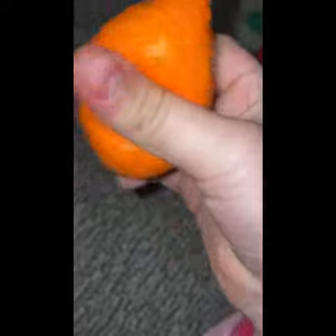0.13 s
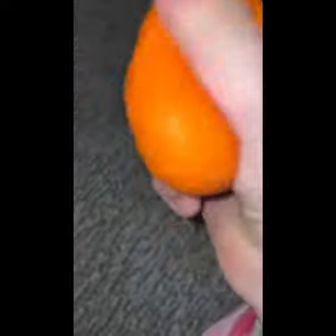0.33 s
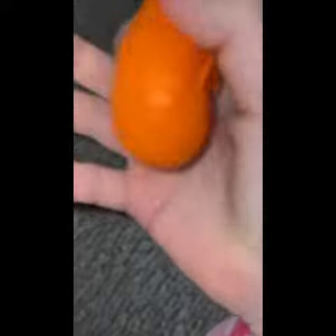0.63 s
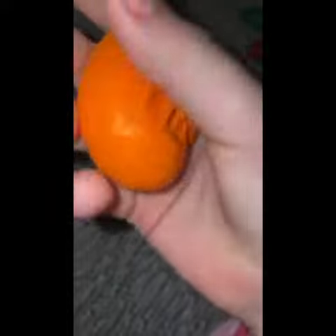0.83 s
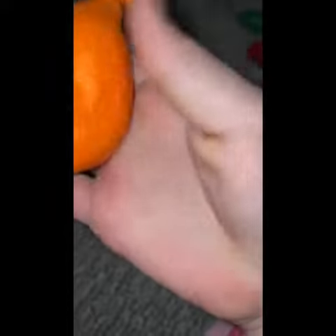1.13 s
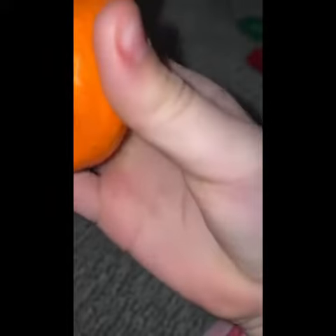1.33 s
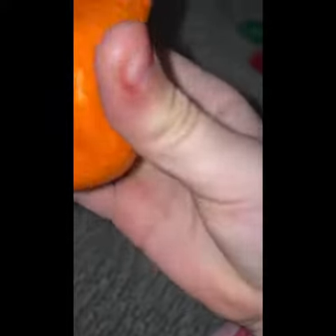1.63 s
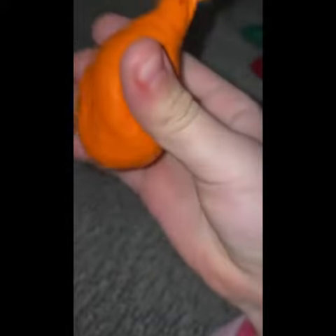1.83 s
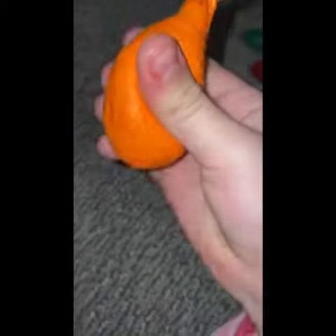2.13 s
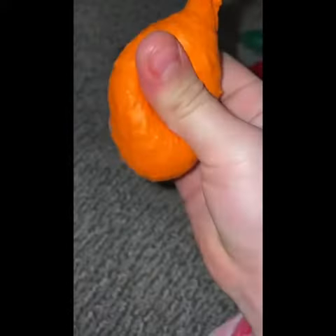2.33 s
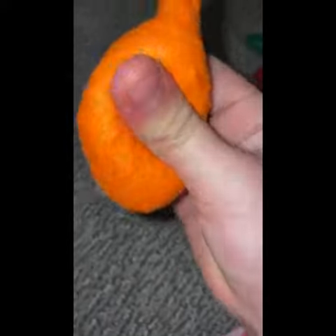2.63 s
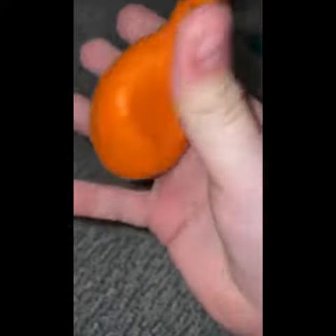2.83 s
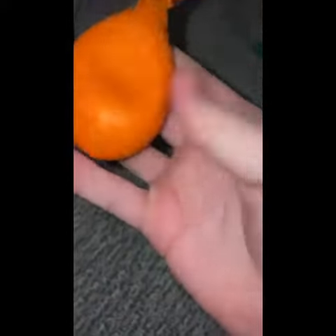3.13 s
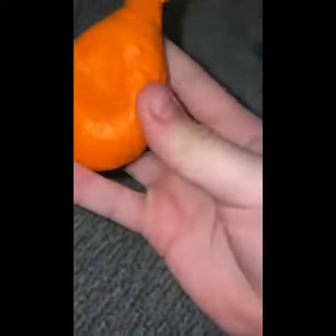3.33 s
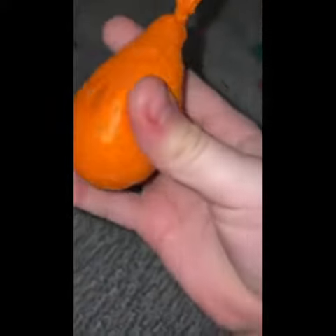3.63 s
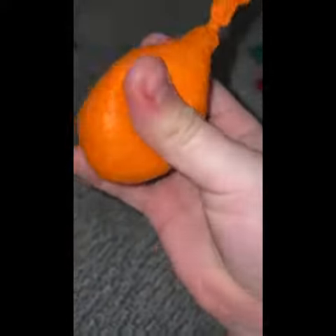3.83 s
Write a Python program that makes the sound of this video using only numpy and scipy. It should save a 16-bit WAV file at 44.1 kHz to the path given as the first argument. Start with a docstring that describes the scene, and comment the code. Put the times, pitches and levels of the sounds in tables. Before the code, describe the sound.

A powder-filled balloon is squeezed close to the microphone: sharp crunch at once, a near-silent pause with faint ticks and rubs, a longer building crackle, another lull, then renewed crunching in a quiet room.

```python
"""A balloon packed with fine powder is squeezed in a hand, close to the microphone, in a quiet room.
The powder yields in short slips, each a burst of tiny ringing grain clicks with a little treble fizz,
over a crunch that follows the squeeze and turns to hiss where it is gentle. Short knocks, bright or
low, are damped rings; skin rubbing on rubber is swells of band noise. The room is faint noise and
low hum."""
import sys
import numpy as np
from scipy import signal
from scipy.fft import rfft, irfft
from scipy.io import wavfile
from scipy.ndimage import uniform_filter1d

SR = 44100
rng = np.random.default_rng(int(sys.argv[2]) if len(sys.argv) > 2 else 0)


def generate_wav(sig):
    """Save sig (samples, or channels by samples) to the path in sys.argv[1] as 16-bit PCM at SR."""
    pcm = np.round(np.clip(np.atleast_2d(sig).T, -1, 1) * 32767).astype(np.int16)
    wavfile.write(sys.argv[1], SR, pcm)


N = 176400


def gain_of(db):
    """Amplitude factor of a level in dB."""
    return 10 ** (np.asarray(db) / 20)


def power_db(power):
    """Level in dB of a power."""
    return 10 * np.log10(power)


def evened(x):
    """Scale to unit RMS."""
    return x / np.sqrt(np.mean(x ** 2) + 1e-20)


def read(points, hz):
    """Interpolate a (frequency, dB) curve on a log-frequency axis."""
    point_hz, point_db = np.transpose(points)
    return np.interp(np.log(hz + 1), np.log(point_hz + 1), point_db)


def add(mix, start_s, sound):
    """Add a sound into the mix in place, cut at its end."""
    part = mix[max(round(start_s * SR), 0):][:len(sound)]
    part += sound[:len(part)]


def coloured(x, gain_db):
    """Causal minimum-phase filter with the given dB on 2049 even frequency steps."""
    log_gain = np.log(gain_of(np.maximum(gain_db, -100)))
    full = np.concatenate([log_gain, log_gain[-2:0:-1]])
    taps = np.fft.ifft(np.exp(np.conj(signal.hilbert(full)))).real
    return signal.oaconvolve(x, taps[:2048])[:len(x)]


def ring(hz, cycles):
    """Damped swing with a soft start; its decay factor is 1/e^2 after the given cycles."""
    turns = np.arange(int(4 * cycles * SR / hz) + 2) * hz / SR
    decay = np.exp(-2 * turns / cycles)
    onset = 1 - np.exp(-turns / 0.13)
    return np.sin(2 * np.pi * turns) * decay * onset


def yielding():
    """Body and fizz envelopes: clumpy steady crunch plus a hump of power for each powder slip."""
    # steady crunch: (time [s], level [dB], treble relative to it [dB])
    crunch = [(0, -60.5, -17), (0.078, -51, -12.5), (0.2, -41.5, -12), (.33, -39.5, -11.5),
              (0.455, -35.5, -11.5), (0.469, -58.5, -10), (0.502, -47.5, -10), (0.511, -39.5, -9),
              (0.583, -37.5, -12.5), (0.595, -47, -11.5), (0.718, -51.5, -12.5), (.745, -64, -7),
              (.96, -73, -3.5), (1.3, -82.5, -19), (2.15, -62, -11.5), (2.42, -58.5, -6), (2.57, -69, -14),
              (2.662, -42.5, -12.5), (2.75, -53, -4), (2.842, -59, -9), (2.902, -83.5, -19),
              (3.3, -75.5, -17.5), (3.6, -71.5, -20.5), (3.62, -53.5, -18.5), (3.87, -48, -10.5),
              (4, -47, -12.5)]
    # slips of the powder: (time [s], nominal peak [dB], length [s])
    slips = [(0.165, -24.5, 0.01), (0.063, -31.5, 0.01), (0.1, -26.5, 0.012), (0.147, -28, 0.014),
             (0.185, -27, 0.015), (0.821, -49, 0.016), (1.057, -46.5, 0.014), (1.187, -48.5, 0.0047),
             (1.31, -56, 0.006), (2.709, -28, 0.0089), (2.8, -42.5, 0.013), (3.675, -36.5, 0.01),
             (3.715, -35.5, 0.015), (3.766, -33, 0.016), (3.885, -30, 0.059), (0.926, -30, 0.005),
             (1.346, -49, 0.0072), (1.392, -50, 0.021), (1.489, -43, 0.024), (1.525, -41, 0.029),
             (1.562, -44.5, 0.032), (1.623, -38, 0.022), (1.665, -37, 0.021), (1.729, -37, 0.014),
             (1.795, -39, 0.019), (1.835, -34.5, 0.019), (1.893, -35, 0.015), (1.933, -31, 0.017),
             (1.976, -29.5, 0.013), (2.011, -32.5, 0.02), (2.052, -31, 0.015), (2.088, -29, 0.017),
             (2.123, -27.5, 0.0097), (2.152, -20.5, 0.0072), (2.209, -21.5, 0.0095), (2.226, -31.5, 0.017),
             (2.247, -32.5, 0.044), (2.274, -26, 0.013), (2.298, -28, 0.023), (2.337, -27.5, 0.012),
             (2.401, -22, 0.013), (2.478, -35.5, 0.0057), (2.749, -24.5, 0.015), (2.811, -25.5, 0.012),
             (3.152, -52, 0.023), (.005, -36.5, 0.019), (0.031, -36.5, 0.028), (0.131, -30.5, .012),
             (0.284, -32, 0.0027), (0.327, -29, 0.017), (0.349, -20, 0.0071), (.478, -27.5, 0.011),
             (0.789, -41, 0.024), (2.176, -29.5, 0.019), (2.364, -23.5, 0.021), (2.386, -16.5, 0.012),
             (0.891, -44, 0.056), (3.312, -41, 0.049), (3.362, -43, 0.048), (3.415, -45.5, 0.032),
             (3.457, -41, 0.025), (3.497, -45, 0.029), (3.533, -43, 0.065), (3.603, -39.5, 0.023),
             (3.639, -33.5, 0.029), (3.739, -33, 0.017), (3.786, -34.5, 0.029), (3.846, -33, 0.018),
             (3.876, -29, 0.014)]
    clump_db, clump_s = 2, 0.0092
    slip_lead_s, slip_below_peak_db = 0.0013, -10.5
    slip_rise = 0.41  # fraction of the length at which the hump peaks
    slip_tail_db, slip_tail_t60_s = -17, 0.041
    body_round, treble_round = 1.43, 3.2  # small = flat-topped burst

    t_s = np.arange(N) / SR
    crunch_s, crunch_db, crunch_treble_db = np.transpose(crunch)
    size = int(clump_s * SR)
    clumps = evened(uniform_filter1d(uniform_filter1d(rng.standard_normal(N), size), size))
    body_power = gain_of(np.interp(t_s, crunch_s, crunch_db) + clump_db * clumps) ** 2
    fizz_power = body_power.copy()

    after_s = np.arange(SR // 8) / SR
    warp = np.log(.5) / np.log(slip_rise)
    for start_s, peak_db, length_s in slips:
        u = np.clip(after_s / max(length_s, .003), 0, 1)
        hump = abs(np.sin(np.pi * u ** warp)) * (u < 1)
        tail = u * gain_of(slip_tail_db - 60 * after_s / slip_tail_t60_s) ** 2
        slip_power = gain_of(peak_db + slip_below_peak_db) ** 2
        add(body_power, start_s - slip_lead_s, (hump ** body_round + tail) * slip_power)
        add(fizz_power, start_s - slip_lead_s, (hump ** treble_round + tail) * slip_power)

    treble_db = np.interp(t_s, crunch_s, crunch_treble_db)
    return np.sqrt(body_power), np.sqrt(fizz_power) * gain_of(treble_db), treble_db


def powder(count=24):
    """Grain clicks of uneven size; each rings briefly at its own pitch and spits a little treble."""
    # body spectrum, relative: (frequency [Hz], density [dB per Hz])
    body_curve = [(250, -3.5), (500, -7.5), (840, 2.5), (1400, 1.5), (2230, 4), (2750, 2.5), (3200, -4.5),
                  (4200, -7.5), (9000, -45)]
    # fizz spectrum, relative: (frequency [Hz], density [dB per Hz])
    fizz_curve = [(3500, 1.5), (8000, -8), (15500, -19.5)]
    grains_per_s, grain_spread_db, grain_cycles = 4000, 3.5, 2.7
    grain_low_hz, grain_high_hz = 578.6, 5970
    smooth_below_db, smooth_range_db = -58, 12  # gentle pressure hisses, firm pressure clicks
    tilt, tilt_centre_db = 1, -13.5  # when the treble is strong, the higher grains ring louder too
    body_to_hz, fizz_from_hz = 9000, 3480

    body, fizz, treble_db = yielding()
    clicks = (rng.random(N) < grains_per_s / SR) * rng.choice([-1., 1.], N)
    clicks = evened(clicks * gain_of(grain_spread_db * np.minimum(rng.exponential(1, N), 4)))
    firm = np.clip((20 * np.log10(body) - smooth_below_db) / smooth_range_db + .5, 0, 1)
    clicks = np.sqrt(firm) * clicks + np.sqrt(1 - firm) * rng.standard_normal(N)

    # each sample excites one of the grain pitches
    kind = rng.integers(0, count, N)
    body = body * gain_of(tilt * (treble_db - tilt_centre_db) * (kind / count - .5))
    pitches_hz = np.linspace(np.sqrt(grain_low_hz), np.sqrt(grain_high_hz), count) ** 2
    grains = [ring(pitch_hz, grain_cycles) for pitch_hz in pitches_hz]
    grains = [grain / np.linalg.norm(grain) for grain in grains]
    pool_db = power_db(np.mean([abs(rfft(grain, 4096)) ** 2 for grain in grains], 0) + 1e-9)
    driven = clicks * body
    rung = sum(signal.oaconvolve(driven * (kind == k), grain)[:N] for k, grain in enumerate(grains))

    # both spectra at unit mean power; the body's top is cut after that
    hz = np.linspace(0, SR / 2, 2049)
    body_db = read(body_curve, hz)
    body_db = body_db - power_db(np.mean(gain_of(body_db) ** 2))
    body_db = body_db - power_db(1 + (hz / body_to_hz) ** 12)
    fizz_db = read(fizz_curve, hz) - power_db(1 + (fizz_from_hz / (hz + 1)) ** 8)
    fizz_db = fizz_db - power_db(np.mean(gain_of(fizz_db) ** 2))
    # subtracting pool_db cancels the grains' mean spectrum
    return coloured(rung, body_db - pool_db) + coloured(clicks * fizz, fizz_db)


def knocks():
    """Short damped knocks, bright or low, alone or layered: a pitched ring, a tick, a hollow ring-on."""
    # rings of the knocks: (time [s], level before damping [dB], pitch [Hz])
    knock_table = [(.381, -18, 3100), (.385, -15, 2800), (.508, -17, 2000), (2.734, -34, 920),
                   (2.387, -28, 693), (2.386, -38.5, 306), (2.757, -24, 734), (2.815, -31.5, 907),
                   (3.907, -32, 2300), (3.932, -29.5, 2320), (3.962, -27.5, 2600)]
    delay_s, knock_cycles = 0.00086, 4.34
    tick_hz, tick_db, tick_cycles = 4600, -9.5, 7.2  # dB relative to the pitched ring
    hollow_hz, hollow_db, hollow_cycles = 905, -14, 24  # the taut skin rings on faintly

    out = np.zeros(N)
    for start_s, db, hz in knock_table:
        add(out, start_s + delay_s, gain_of(db) * ring(hz, knock_cycles))
        add(out, start_s + delay_s, gain_of(db + tick_db) * ring(tick_hz, tick_cycles))
        add(out, start_s + delay_s, gain_of(db + hollow_db) * ring(hollow_hz, hollow_cycles))
    return out


def rubs():
    """Smooth rubs of skin on rubber: soft swells of hiss in a broad band."""
    # rubs: (start [s], length [s], level [dB], centre [Hz])
    rub_table = [(0.687, 0.041, -58.5, 7800), (0.754, 0.042, -63, 5270), (0.922, 0.033, -56.5, 5460),
                 (1, 0.26, -70, 2820), (1.12, 0.1, -71.5, 3930), (2.582, 0.11, -54.5, 3980),
                 (2.923, .045, -76, 2600), (3.162, 0.11, -79, 2100)]
    width_octaves = .42

    out = np.zeros(N)
    hz = np.fft.rfftfreq(16384, 1 / SR) + 1
    for start_s, length_s, db, centre_hz in rub_table:
        noise = rng.standard_normal(16384)
        octaves_off = np.log2(hz / centre_hz)
        band = evened(irfft(rfft(noise) / (1 + (octaves_off / width_octaves) ** 4)))
        u = np.arange(0, length_s, 1 / SR) / length_s
        swell = np.sin(np.pi * u) ** 0.59
        add(out, start_s, gain_of(db) * swell * band[:len(u)])
    return out


def room():
    """Faint broad noise with a few narrow wavering bands of low hum."""
    # room noise spectrum, relative: (frequency [Hz], density [dB per Hz])
    air_curve = [(40, -8), (270, 0), (400, -13), (600, -20), (1300, -31.5), (2200, -60), (6000, -38),
                 (16000, -48)]
    # wavering bands of the hum: (centre [Hz], width [Hz], level [dB])
    hum = [(68.3, 18, -65.5), (93, 17, -66), (133.5, 23, -62.5), (231.4, 24, -67), (283.4, 7.9, -66.5)]
    air_db = -62.5

    hz = np.fft.rfftfreq(N, 1 / SR)
    air_spectrum = rfft(rng.standard_normal(N)) * gain_of(read(air_curve, hz))
    out = gain_of(air_db) * evened(irfft(air_spectrum, N))
    for centre_hz, width_hz, db in hum:
        band_spectrum = rfft(rng.standard_normal(N)) / (1 + (2 * (hz - centre_hz) / width_hz) ** 2)
        out += gain_of(db) * evened(irfft(band_spectrum, N))
    return out


def scene():
    """Sum of all sources, one channel."""
    return (powder() + knocks() + rubs() + room())[None]


def record(dry):
    """The microphone's bass cut, then the band limit."""
    bass_cut_hz, edge_hz = 56, 16100
    high_pass = signal.butter(4, bass_cut_hz, "high", fs=SR, output="sos")
    low_pass = signal.firwin(511, edge_hz, window=("kaiser", 9), fs=SR)
    thin = signal.sosfilt(high_pass, dry)
    return signal.oaconvolve(thin, low_pass[None], "same")


dry = scene()
out = record(dry)
generate_wav(out)
```